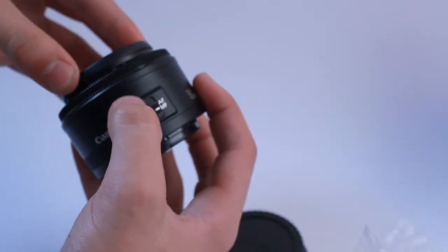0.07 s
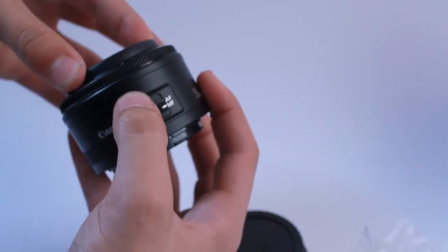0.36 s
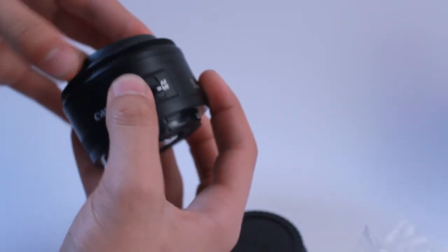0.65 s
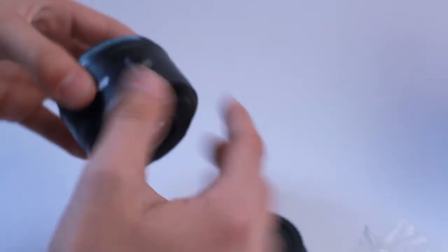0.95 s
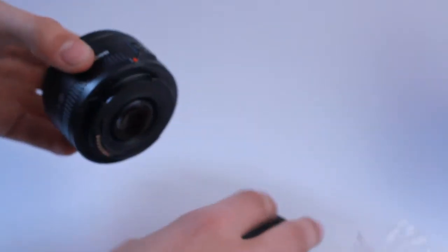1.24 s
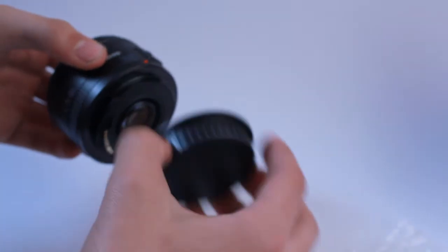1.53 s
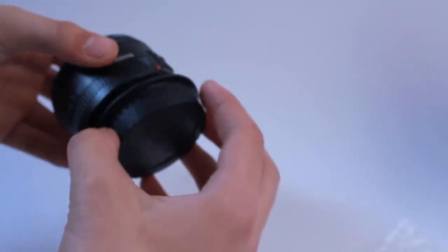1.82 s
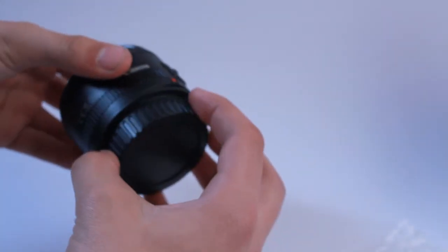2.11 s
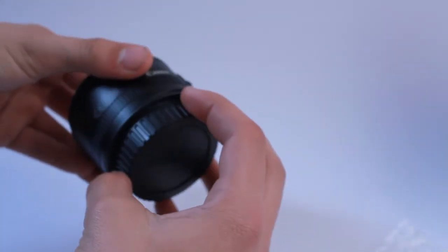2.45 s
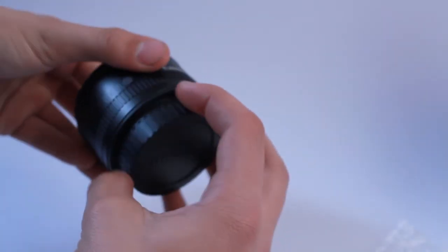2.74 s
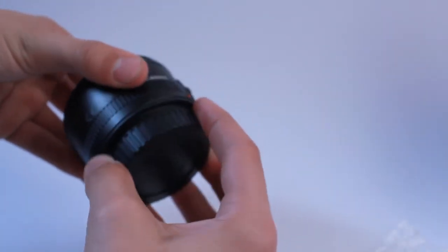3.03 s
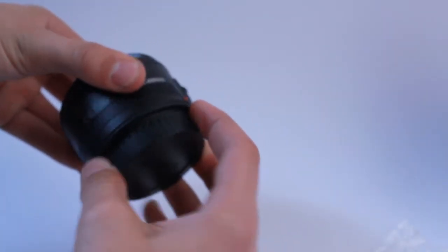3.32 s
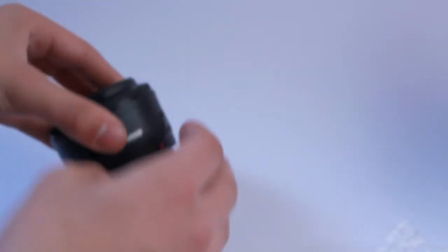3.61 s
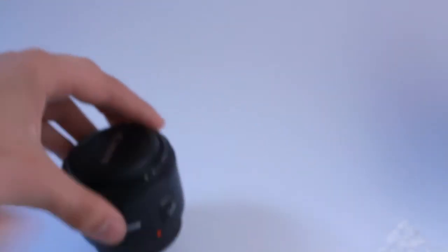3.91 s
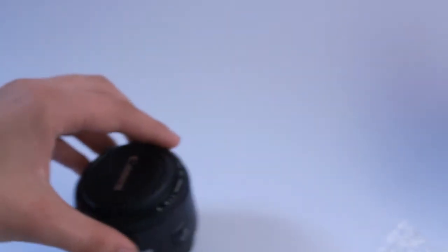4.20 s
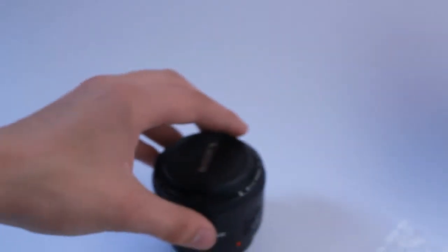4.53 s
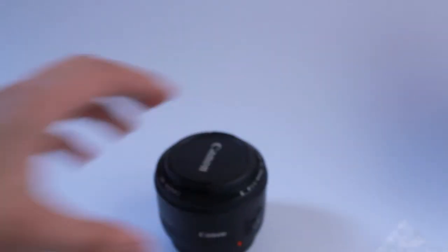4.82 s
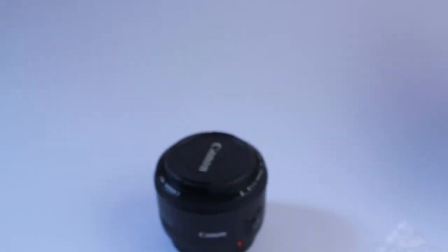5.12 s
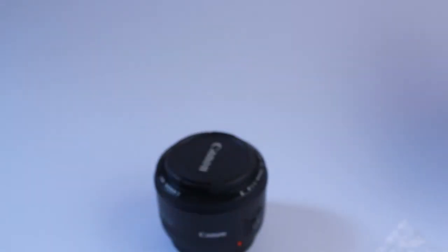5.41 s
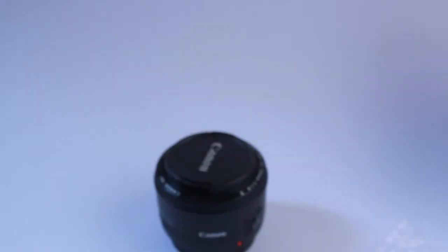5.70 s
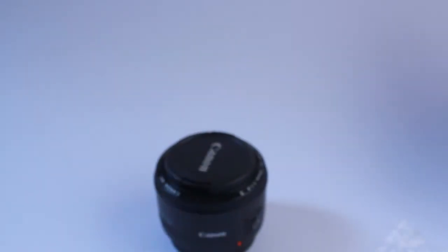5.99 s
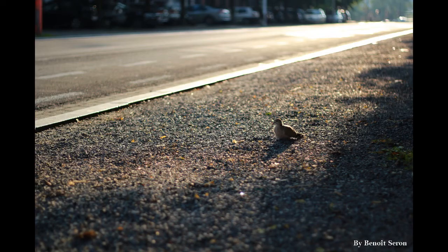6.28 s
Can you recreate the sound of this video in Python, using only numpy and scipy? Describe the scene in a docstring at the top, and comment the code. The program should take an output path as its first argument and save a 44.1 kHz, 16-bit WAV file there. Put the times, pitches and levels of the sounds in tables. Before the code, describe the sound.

A camera lens is handled close by in a small quiet room, over a faint steady hiss. At about 0.2 seconds a plastic cap taps the rim, and its latches snap in sharply at 0.3 and 0.45 seconds, the loudest sounds. Fingers brush softly, with light knocks. Around 1.3 seconds the rear cap scrapes briefly off the table. It bumps the lens with a click at 1.7 seconds, then settles with small clicks and short rubs until about 2.1. It locks with a crisp snap near 2.6 seconds and gives another short twisting scrape around 2.8. Hands and sleeves rustle softly from 3 to 4 seconds. At 4.2 the lens is set on the table with a soft knock and slides until about 4.6. Light ticks, small knocks and brushing follow around 5 seconds, then a few faint ticks near 5.7 and 6.2.

```python
"""Putting the caps on a camera lens

In a small quiet room, the plastic front cap taps on the rim and its springy latches snap in.
The rear cap is picked up, seated and twisted until it locks. The lens is set down and slid over
the table while hands and sleeves rustle. Each cap click is a short crack of noise plus the ringing
of the part; each rub is a crowd of tiny slips."""
import sys
import numpy as np
from scipy import signal
from scipy.fft import rfft, irfft
from scipy.io import wavfile

SR = 44100
rng = np.random.default_rng(int(sys.argv[2]) if len(sys.argv) > 2 else 0)


def wrap_up_sound(samples):
    """Save the sound to the file named by the first command line argument, as 16-bit audio."""
    columns = np.atleast_2d(samples).T
    # keep every value between -1 and 1, then stretch to whole-number steps
    tamed = np.clip(columns, -1, 1)
    steps = np.round(tamed * 32767).astype(np.int16)
    wavfile.write(sys.argv[1], SR, steps)


N = 280035
CUTOFF_HZ = 15900
TIME = np.arange(N) / SR
AGE = TIME[:SR // 6]      # seconds since a hit
ATTACK = SR * 7 // 1000   # samples in the first 7 ms

# Fingers brushing over plastic and table: (middle time [s], length [s], level [dB])
FINGER_SWEEPS = [(1.042, 0.22, -46.5), (1.19, 0.11, -49.5), (1.54, 0.12, -55), (2.875, 0.046, -56),
                 (3.04, 0.055, -45.5), (3.12, 0.096, -48.5), (3.498, 0.22, -48.5), (3.735, 0.34, -43.5),
                 (4.087, 0.35, -50.5), (4.53, .09, -53), (4.891, 0.23, -44)]
# Arms moving in their sleeves: (middle time [s], length [s], level [dB])
ARM_SWEEPS = [(3.5, 0.14, -48.5), (3.645, 0.12, -42), (3.78, 0.28, -42), (4.06, 0.25, -47),
              (5.07, 0.24, -52)]


def from_db(db):
    """Turn decibels into a gain."""
    return 10 ** (np.asarray(db) / 20)


def rms_one(x):
    """Scale a sound to an average power of one."""
    return x / np.sqrt(np.mean(x ** 2) + 1e-20)


def attack_one(x):
    """Scale a hit to a power of one over its first 7 ms."""
    return x / np.sqrt(np.mean(x[:ATTACK] ** 2) + 1e-20)


def at_hz(points, hz):
    """Read between a table's rows, on a scale of octaves."""
    points = np.array(points)
    return np.interp(np.log(hz), np.log(points[:, 0]), points[:, 1])


def band(x, low, high, order=2):
    """Keep the frequencies from low to high, in Hz."""
    sos = signal.butter(order, [low, min(high, SR / 2 - 500)], "band", fs=SR, output="sos")
    return signal.sosfilt(sos, x + 1e-18)


def coloured(x, spectrum):
    """Give noise a tone colour and a power of one."""
    hz = np.maximum(np.fft.rfftfreq(N, 1 / SR), 1)
    return rms_one(irfft(rfft(x) * from_db(at_hz(spectrum, hz)), N))


def add(out, s, sound):
    """Mix a sound in at s seconds."""
    start = int(s * SR)
    out[start:start + len(sound)] += sound[:N - start]


def echoes(x, build_up_s=0.01, first_echo_s=0.0016):
    """Room echoes build up and die band by band, in a new pattern for each call."""
    # How long echoes take to fade by 60 dB: (frequency [Hz], fade time [s])
    fade_times = [(300, 0.72), (800, 0.25), (2000, 0.63), (5500, 0.33), (14000, 0.55)]
    # Echoes compared with the direct sound: (frequency [Hz], level [dB])
    levels = [(200, -11), (800, -2.5), (1700, -7), (5000, -8), (14000, -16)]
    age = TIME[:SR * 2 // 3]
    onset = 1 - np.exp(-np.maximum(age - first_echo_s, 0) / build_up_s)
    edges = np.geomspace(120, 17000, 15)
    response = 0
    for low, high in zip(edges, edges[1:]):
        hz = np.sqrt(low * high)
        fade = from_db(-60 * age / at_hz(fade_times, hz))
        tail = band(rng.standard_normal(len(age)), low, high) * onset * fade
        tail *= np.sqrt(2 * (high - low) / SR / np.sum(tail ** 2))   # as strong as the direct sound
        response = response + tail * from_db(at_hz(levels, hz))
    return signal.fftconvolve(x, response)[:N]


def room(x, wet_db):
    """The direct sound plus its echoes, turned down by wet_db."""
    return x + from_db(wet_db) * echoes(x)


def soft_blows(blows, cycles, scatter_db, width):
    """A blunt hit: one short swing at its pitch, plus a noisy scatter of vibrations around it."""
    out = np.zeros(N)
    for s, db, hz, half_fade_s in blows:
        swing = attack_one(np.sin(2 * np.pi * hz * AGE) * np.exp(-AGE * hz / cycles))
        scatter = rng.standard_normal(len(AGE)) * from_db(-30 * AGE / half_fade_s)
        scatter = attack_one(band(scatter, hz / 2, hz * 2, order=1))
        blow = band(swing + from_db(scatter_db) * scatter, hz / (1 + width), hz * (1 + width))
        add(out, s, from_db(db) * attack_one(blow))
    return out


def crack(levels_db, fade_s, rise_s, bass_hz):
    """A plastic shell's many vibrations die quickly and blur into a burst of noise."""
    edges_hz = (200, 1000, 2600, 8000, 16000)   # four bands: low, middle, high, top
    shape = (1 - np.exp(-AGE / rise_s)) * from_db(-60 * AGE / fade_s)
    small_body = signal.butter(2, bass_hz, "high", fs=SR)   # a small part gives off little bass
    out = 0
    for db, low, high in zip(levels_db, edges_hz, edges_hz[1:]):
        burst = signal.lfilter(*small_body, rng.standard_normal(len(AGE)) * shape)
        out = out + from_db(db) * attack_one(band(burst, low, high, order=3))
    return out


def ring(tones, rise_s, spread_db=4.0):
    """A struck part rings with its own tones, their strengths varying from hit to hit."""
    hz, db, fade_s = np.transpose(tones)[:, :, None]
    strength = from_db(db + spread_db * rng.standard_normal(hz.shape))
    waves = np.sin(2 * np.pi * (hz * AGE + rng.random(hz.shape))) * from_db(-60 * AGE / fade_s)
    struck = (strength * waves).sum(axis=0) * (1 - np.exp(-AGE / rise_s))
    return attack_one(band(struck, hz.min() / 2, CUTOFF_HZ))


def cap_clicks(contacts, tones, crack_db, ring_db, rise_s, bass_hz, wet_db, ring_wet_db):
    """Edges graze, then the part cracks and rings; crack_db and ring_db add to the contacts' levels."""
    graze_db, graze_s = -20, 0.0013
    cracks, rings = np.zeros((2, N))
    for s, *levels_db, fade_s, db in contacts:
        add(cracks, s - graze_s, from_db(graze_db) * crack(levels_db, fade_s, rise_s, bass_hz))
        add(cracks, s, from_db(crack_db) * crack(levels_db, fade_s, rise_s, bass_hz))
        add(rings, s, from_db(db + ring_db) * ring(tones, rise_s))
    return cracks + rings + echoes(from_db(wet_db) * cracks + from_db(ring_wet_db) * rings)


def friction(gain, spectrum, slips_per_s, smooth=1.0):
    """Countless tiny slips of uneven size over a smooth rub."""
    slips = rms_one(rng.standard_normal(N) * (rng.random(N) < slips_per_s / SR))
    return gain * coloured(slips + smooth * rng.standard_normal(N), spectrum)


def pushes(rows, rise_s, fall_db_per_s):
    """Loudness of pushes: a part breaks loose, scrapes evenly, then runs out."""
    power = np.zeros(N)
    for start, length, db in rows:
        age = TIME - start
        onset = np.clip(age / rise_s, 0, 1)
        fall_db = fall_db_per_s * np.clip(age - length, 0, 1)
        power += (onset * from_db(db - fall_db)) ** 2
    return np.sqrt(power)


def sweeps(rows):
    """Loudness of sweeps: rubbing swells and fades as a hand or arm speeds up and slows down."""
    power = np.zeros(N)
    for middle, length, db in rows:
        bell = 0.5 ** np.minimum((2 * (TIME - middle) / length) ** 2, 20)   # above half for its length
        power += (from_db(db) * bell) ** 2
    return np.sqrt(power)


def hiss(level_db=-57):
    """A faint, steady background noise."""
    # Tone colour of the hiss: (frequency [Hz], relative level [dB])
    colour = [(15, -56), (25, -21), (102, -2.5), (145, -7), (180, -7), (212, -9), (301, -5.5), (503, -10),
              (695, -8), (754, -10.5), (962, -9), (4610, -14), (16000, -21.5)]
    return from_db(level_db) * coloured(rng.standard_normal(N), colour)


def ticks():
    """Light contacts make small, dry ticks."""
    # Ticks: (time [s], level [dB], pitch [Hz], time for the scatter to fall 30 dB [s])
    hits = [(.041, -50.5, 1900, 0.023), (.702, -38, 1780, 0.0091), (4.784, -31.5, 1240, 0.018),
            (4.827, -34.5, 1230, 0.011), (4.9777, -27, 1500, 0.014), (5.725, -43.5, 2450, 0.023),
            (6.1725, -38, 2220, 0.014), (6.236, -52, 1470, 0.024), (6.248, -51, 1500, 0.022),
            (6.259, -56, 1500, .018)]
    return room(soft_blows(hits, cycles=1.0, scatter_db=-1.5, width=0.73), wet_db=-8.5)


def front_cap_taps():
    """The front cap taps on the rim of the lens."""
    # Taps: (time [s], low [dB], middle [dB], high [dB], top [dB], crack fade time [s], ring [dB])
    taps = [(0.1654, -56, -24.5, -25, -22, 0.011, -7.5), (0.1818, -46.5, -25, -43, -38, 0.068, -27),
            (0.2542, -45, -29.5, -56, -35, 0.11, -30)]
    # The front cap's ringing: (pitch [Hz], relative level [dB], fade time [s])
    tones = [(484, -28, 0.031), (1393, -17, 0.044), (1700, -1.5, 0.015), (2856, -12.5, 0.03),
             (4540, -4.5, 0.033), (4910, 3.5, 0.014), (5980, -19, 0.048), (7380, -5, 0.019),
             (7530, -10.5, 0.023), (10650, -17, 0.027), (15000, -7, 0.017)]
    return cap_clicks(taps, tones, crack_db=-3.5, ring_db=-4, rise_s=0.00087, bass_hz=453,
                      wet_db=-1.5, ring_wet_db=-7)


def latch_snaps():
    """Springs snap the front cap's latches into place."""
    # Snaps: (time [s], low [dB], middle [dB], high [dB], top [dB], crack fade time [s], ring [dB])
    snaps = [(0.2839, -34.5, -17, -17, -16, 0.016, -19.5), (0.2932, -29, -30, -17.5, -18, 0.033, -27.5),
             (0.4462, -25.5, -18, -15, -14.5, 0.018, -22.5), (0.4634, -31, -44, -43, -35.1, 0.027, -29.5)]
    # The latches' ringing: (pitch [Hz], relative level [dB], fade time [s])
    tones = [(870, -23, 0.058), (1387, -8.5, 0.014), (1840, -2, 0.017), (4320, -1, 0.012),
             (4870, -6, 0.016), (6220, -5, 0.009), (7460, 0, 0.0068), (11170, -2.5, 0.0083)]
    return cap_clicks(snaps, tones, crack_db=-3, ring_db=5.5, rise_s=0.00032, bass_hz=540,
                      wet_db=-2, ring_wet_db=-3.5)


def table_knocks():
    """Fingers, cap and lens knock softly on the table."""
    # Knocks: (time [s], level [dB], pitch [Hz], time for the scatter to fall 30 dB [s])
    hits = [(0.642, -42.4, 536, 0.034), (1.104, -41, 523, 0.019), (1.86, -46.5, 452, .02),
            (2.802, -45, 523, 0.034), (3.134, -42, 380, 0.011), (3.513, -44, 258, 0.022),
            (3.853, -45, 300, 0.033), (4.1925, -27.5, 445, 0.059), (4.691, -40.5, 322, 0.041),
            (4.901, -42.5, 780, 0.016), (4.999, -40, 485, 0.018), (5.0305, -36.5, 427, 0.015),
            (5.158, -52.5, 350, .02)]
    return soft_blows(hits, cycles=0.94, scatter_db=-2, width=1.34)


def finger_rub():
    """Fingers brush about, and never rest quite still while they hold the lens."""
    # Tone colour of rubbing skin: (frequency [Hz], relative level [dB])
    colour = [(29, -28), (50, -12), (461, -3), (532, -4), (694, -4.5), (1240, -5.5), (2810, -4.5),
              (14200, -10.5), (16000, -11)]
    start_s, length_s, level_db = 0.73, 4.56, -58
    grip = pushes([(start_s, length_s, level_db)], rise_s=0.12, fall_db_per_s=33)
    return friction(np.hypot(grip, sweeps(FINGER_SWEEPS)), colour, slips_per_s=6500)


def finger_bumps(per_s=35, relative_db=-18.5, low_hz=80, high_hz=450):
    """Fingertips pad on the lens barrel at random while hands and arms move."""
    touches = (rng.random(N) < per_s / SR) * rng.uniform(-1.05, 1, N)
    thuds = rms_one(band(touches, low_hz, high_hz))
    return from_db(relative_db) * sweeps(ARM_SWEEPS + FINGER_SWEEPS) * thuds


def snicks():
    """Nails catch on the barrel, and the rim on the table: cracks with no ringing."""
    # Catches: (time [s], low [dB], middle [dB], high [dB], top [dB], fade time [s])
    catches = [(1.034, -63, -68, -52, -53, .008), (2.373, -60, -70, -54, -54, .01),
               (2.396, -55, -62, -52, -53, .01), (2.421, -64, -66, -57, -53, .01),
               (3.552, -58, -49, -57, -54, .008), (4.1915, -40, -36, -44, -46.5, 0.03),
               (4.511, -47, -48, -43.5, -51, 0.025)]
    out = np.zeros(N)
    for s, *levels_db, fade_s in catches:
        add(out, s, crack(levels_db, fade_s, rise_s=0.00036, bass_hz=300))
    return out


def rear_cap_pick_up():
    """The rear cap scrapes as it is dragged off the table."""
    # Drags: (start [s], length [s], level [dB])
    drags = [(1.299, 0.021, -39), (1.335, 0.046, -39)]
    # Tone colour of the scrape: (frequency [Hz], relative level [dB])
    colour = [(150, -28), (450, -6.5), (750, -8.5), (1240, -2), (1700, -10), (3000, -19), (3900, -21),
              (4350, -14), (5000, -19), (7200, -20.5), (9000, -26), (12200, -22), (13100, -20),
              (16000, -35)]
    gain = pushes(drags, rise_s=0.0075, fall_db_per_s=300)
    return room(friction(gain, colour, slips_per_s=2400, smooth=1.1), wet_db=-10)


def barrel_bumps():
    """The rear cap bumps the lens barrel and sets it ringing."""
    # Bumps: (time [s], low [dB], middle [dB], high [dB], top [dB], crack fade time [s], ring [dB])
    bumps = [(1.7050, -29, -27, -32.5, -29, 0.016, -19), (1.7118, -29, -23, -38, -47, 0.012, -39)]
    # The barrel's ringing: (pitch [Hz], relative level [dB], fade time [s])
    tones = [(504, -12, 0.027), (1260, -4, 0.025), (1645, -6.5, 0.2), (2020, -3.5, 0.073),
             (2360, -21, 0.038), (4590, -5, 0.017), (7080, 3, 0.015), (9870, -1, 0.013), (11860, -4, .01)]
    return cap_clicks(bumps, tones, crack_db=-2, ring_db=0.3, rise_s=0.00022, bass_hz=386,
                      wet_db=-1.5, ring_wet_db=-1.5)


def rear_cap_twist():
    """The rear cap rubs as it turns in its mount."""
    # Turns: (start [s], length [s], level [dB])
    turns = [(1.722, 0.034, -35.5), (1.845, 0.042, -42), (1.905, 0.036, -32.5), (2.02, .025, -43),
             (2.068, 0.023, -40), (2.29, 0.095, -54), (2.625, .035, -30), (2.808, 0.032, -40.5),
             (2.838, 0.054, -32.5)]
    # Tone colour of the turning cap: (frequency [Hz], relative level [dB])
    colour = [(200, -65), (500, -5.5), (740, -15), (1100, -3), (1400, -6.5), (1620, 6.5), (1850, -20),
              (2080, -2.5), (2500, -16), (3200, -10), (3800, -26), (4700, -18.5), (13000, -21),
              (16000, -34)]
    gain = pushes(turns, rise_s=0.017, fall_db_per_s=480)
    return room(friction(gain, colour, slips_per_s=2600, smooth=0.89), wet_db=-2.5)


def rear_cap_seating():
    """The rear cap clicks as it settles into its mount."""
    # Clicks: (time [s], low [dB], middle [dB], high [dB], top [dB], crack fade time [s], ring [dB])
    clicks = [(1.9002, -37.5, -49, -41, -38, 0.02, -33.5), (1.9182, -45, -36, -57, -53, 0.021, -46),
              (1.9492, -45, -30.5, -54, -38.5, 0.032, -19), (2.0012, -42, -40, -25.5, -34.5, 0.016, -20)]
    # The rear cap's ringing: (pitch [Hz], relative level [dB], fade time [s])
    tones = [(510, -11, 0.019), (1410, -15, 0.049), (1702, 2, 0.048), (1997, 2, 0.024), (3156, -8, 0.041),
             (4300, -6, 0.02), (5300, -17, 0.023), (6870, -10, 0.018)]
    return cap_clicks(clicks, tones, crack_db=1.5, ring_db=1, rise_s=0.00051, bass_hz=407,
                      wet_db=-1, ring_wet_db=-4)


def rear_cap_lock():
    """The rear cap's twist lock snaps shut."""
    # Snaps: (time [s], low [dB], middle [dB], high [dB], top [dB], crack fade time [s], ring [dB])
    snaps = [(2.6265, -25, -32, -23, -19, 0.022, -17), (2.6343, -20, -19, -36, -42, 0.0097, -29),
             (2.6663, -24, -22, -27, -28, 0.017, -29), (2.679, -33, -31, -49, -51, 0.018, -43),
             (2.893, -38.5, -34, -38, -44, 0.029, -52)]
    # The lock's ringing: (pitch [Hz], relative level [dB], fade time [s])
    tones = [(540, -15, .02), (855, -3, 0.053), (1656, 0, 0.051), (2017, 0, 0.043), (4180, 10, 0.019),
             (4200, -8, 0.0099)]
    return cap_clicks(snaps, tones, crack_db=-1.5, ring_db=-1.5, rise_s=0.00016, bass_hz=610,
                      wet_db=-1.5, ring_wet_db=-5)


def sleeve_rustle():
    """Sleeves rub as the arms move."""
    # Tone colour of the cloth: (frequency [Hz], relative level [dB])
    colour = [(29, -42), (50, -15), (223, -14), (398, -6.5), (711, -5), (1620, 0.5), (1820, -2), (3410, -5),
              (12600, -15.5), (16000, -20)]
    return friction(sweeps(ARM_SWEEPS), colour, slips_per_s=3200)


def lens_slide():
    """The lens scrapes as it is pushed over the table."""
    # Pushes: (start [s], length [s], level [dB])
    slides = [(4.193, 0.12, -45.5), (4.355, 0.14, -43.5), (4.503, 0.045, -39.5)]
    # Tone colour of the sliding lens: (frequency [Hz], relative level [dB])
    colour = [(29, -40), (50, -13.5), (246, -8.5), (284, -8.5), (362, -7), (439, -9), (1240, -2.5),
              (1500, -7.5), (4350, -14), (4790, -18.5), (13200, -26), (16000, -27)]
    return friction(pushes(slides, rise_s=0.009, fall_db_per_s=113), colour, slips_per_s=2500)


def scene():
    """Caps, knocks and rubbing over a steady hiss."""
    front_cap = front_cap_taps() + latch_snaps()
    rear_clicks = barrel_bumps() + rear_cap_seating() + rear_cap_lock()
    knocks = room(table_knocks() + snicks(), wet_db=-5) + ticks()
    scrapes = rear_cap_pick_up() + rear_cap_twist() + lens_slide()
    rustle = finger_rub() + sleeve_rustle()
    return hiss() + front_cap + rear_clicks + knocks + scrapes + rustle + finger_bumps()


def record(dry):
    """Round off the highest peaks and cut the very top of the treble."""
    rounded = 1.258 * np.tanh(dry / 1.338)
    low_pass = signal.ellip(10, 0.1, 70, CUTOFF_HZ, fs=SR, output="sos")
    return signal.sosfilt(low_pass, rounded)


dry = scene()
out = record(dry)
wrap_up_sound(out)
```